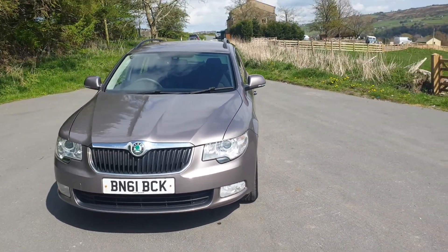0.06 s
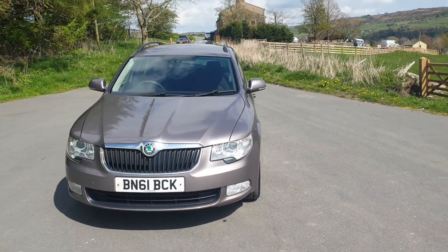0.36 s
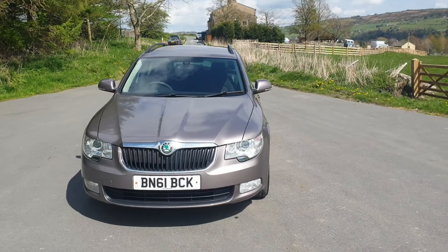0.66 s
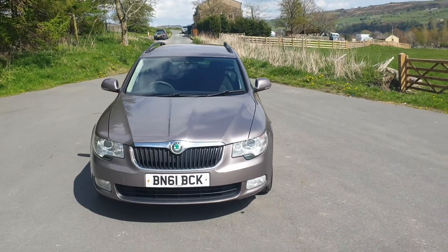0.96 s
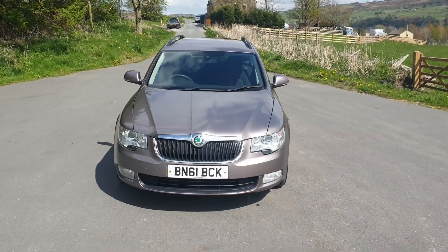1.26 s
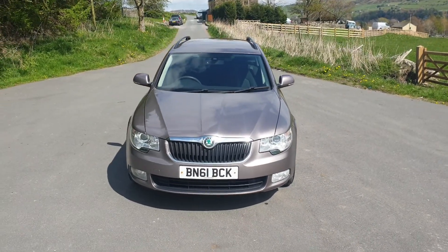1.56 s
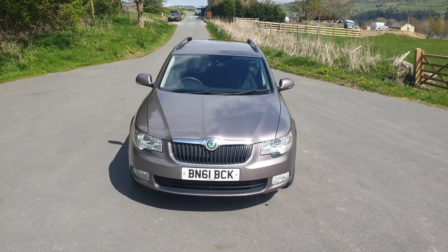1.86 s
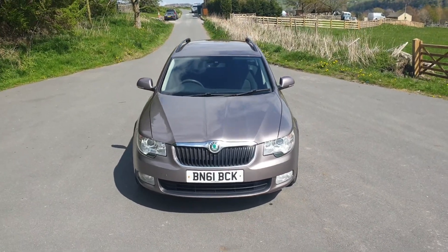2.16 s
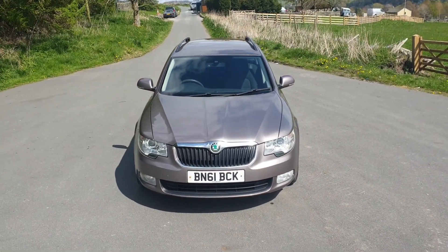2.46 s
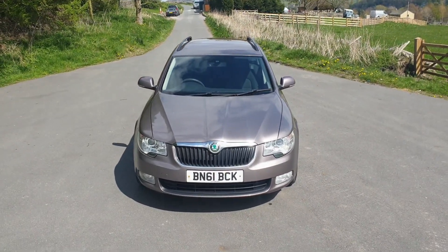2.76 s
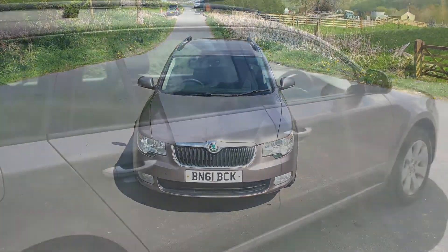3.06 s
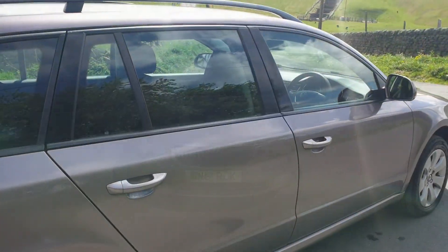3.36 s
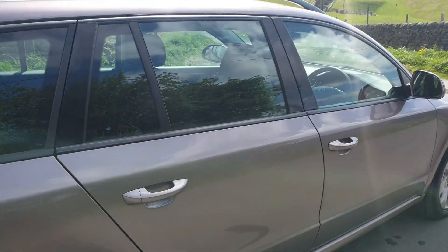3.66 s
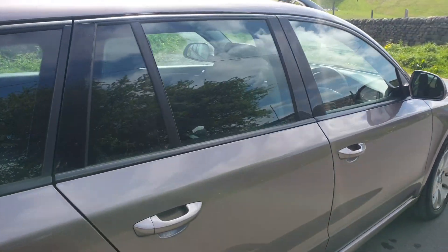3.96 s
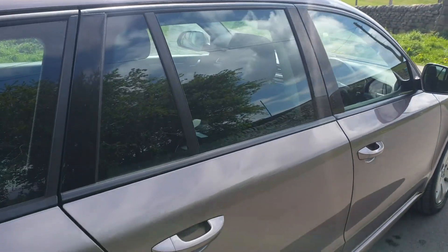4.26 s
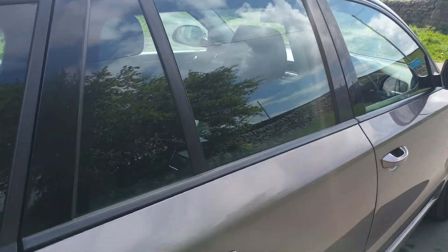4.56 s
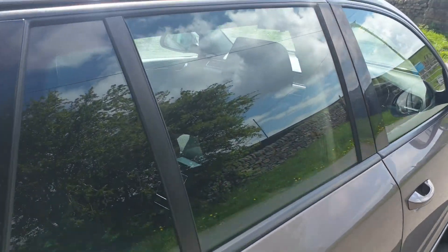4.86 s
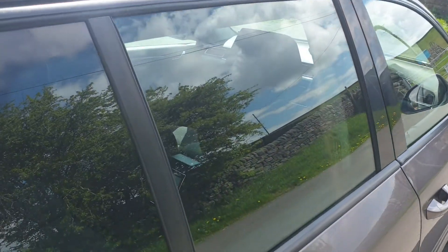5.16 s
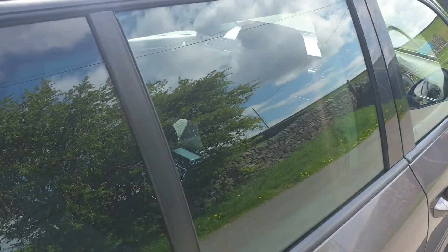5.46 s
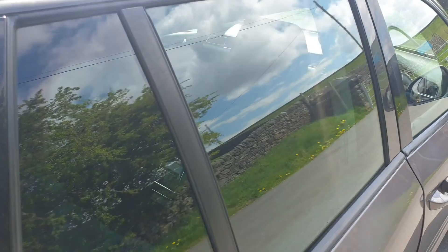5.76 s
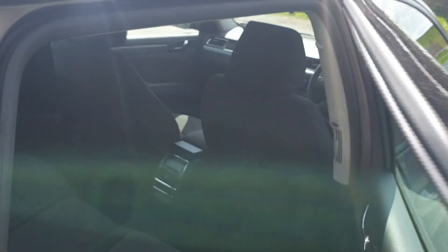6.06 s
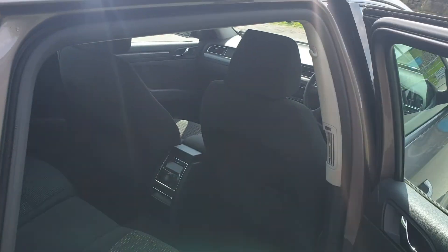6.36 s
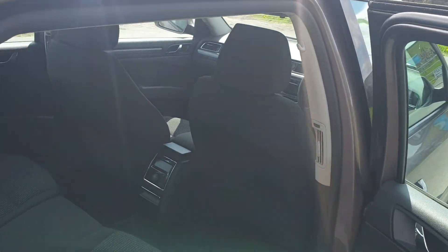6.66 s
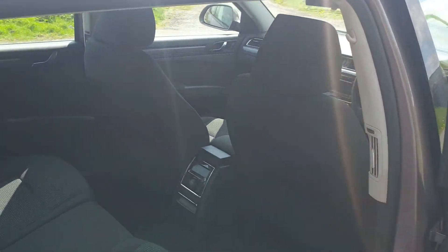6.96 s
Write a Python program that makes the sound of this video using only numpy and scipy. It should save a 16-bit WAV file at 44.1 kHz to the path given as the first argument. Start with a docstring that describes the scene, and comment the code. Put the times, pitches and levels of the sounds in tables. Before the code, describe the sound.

A faint open-air hiss runs throughout. From the start, a car backs slowly away straight ahead, its engine throbbing low and quiet over a soft tyre roar. Grit pops and crunches under the tyres around 0.6 seconds and again from 1.3 to 1.7. Small birds to the right open with a quick trill, then give scattered high, gliding whistles until nearly 6 seconds, with faint leaf rustle. At about 3.3 seconds the car fades out and wind begins buffeting the microphone, with uneven rumble and low thumps shifting between sides until the end. At 5.6 seconds a car door handle is pulled close by, making a quick cluster of clunks. Just after 6 seconds the latch snaps free with a sharp metallic clack, the loudest sound, and a brief rustle of rubber seal. A few light knocks and ticks follow as the door swings open, through 7 seconds.

```python
"""On a country lane, a car backs slowly away from the microphone, engine throbbing, tyres popping grit.
Small birds whistle in the hedges, off to the right, and leaves stir over a faint hiss of open air.
After about three seconds the car fades out, and wind buffets the microphone, now close to its side.
The rear door handle is pulled, the latch snaps free and the door swings open,
each contact ringing the panels while plastic and rubber rub."""
import sys
import numpy as np
from scipy import signal
from scipy.io import wavfile

SR = 44100
rng = np.random.default_rng(int(sys.argv[2]) if len(sys.argv) > 2 else 0)


def to_wav(s):
    """Save 16-bit WAV."""
    ch = np.atleast_2d(s).T  # columns
    pcm = np.round(np.clip(ch, -1, 1) * 32767)  # PCM
    wavfile.write(sys.argv[1], SR, pcm.astype(np.int16))


N = 313101
TIME = np.arange(N) / SR
CUTOFF_HZ = 15850


def from_db(db):
    return 10 ** (np.asarray(db) / 20)


def rms_one(x):
    return x / np.sqrt(np.mean(x ** 2) + 1e-20)


def in_time(rows):
    """Each column of a curve at every sample."""
    s, *columns = np.transpose(rows)
    return [np.interp(TIME, s, c) for c in columns]


def at_hz(points, hz, column=1):
    """One column of a table, read on a log-frequency axis."""
    points = np.array(points)
    return np.interp(np.log(hz), np.log(points[:, 0]), points[:, column])


def panned(left_right_db):
    """Left and right gains of constant power; positive is to the left."""
    gains = from_db(np.array([[.5], [-.5]]) * left_right_db)
    return gains / np.sqrt(np.mean(gains ** 2, axis=0))


def add(out, s, sound):
    """Mix a sound in at a time."""
    start = max(round(s * SR), 0)
    out[..., start:start + sound.shape[-1]] += sound[..., :N - start]


def filtered(x, hz, kind, order=2):
    sos = signal.butter(order, np.clip(hz, 10, .45 * SR), kind, fs=SR, output="sos")
    return signal.sosfilt(sos, x)


def drift(rate_hz):
    """A smooth random wander with rms 1."""
    pole = np.exp(-80 * np.pi * rate_hz / SR)
    white = rng.standard_normal(N // 40 + 2002)
    slow = signal.lfilter([1], [1, -2 * pole, pole * pole], white)[2000:]
    return np.interp(np.arange(N) / 40, np.arange(len(slow)), rms_one(slow))


def swell(s, width_s, db):
    """A bell-shaped rise and fall around a moment."""
    return from_db(db) * np.exp(-.5 * ((TIME - s) / width_s) ** 2)


def noise_bands(size, low_hz, high_hz, likeness):
    """Half-octave bands of stereo noise, each with its centre in Hz."""
    edges = 22 * 2 ** np.arange(0, 10, .5)
    white = rng.standard_normal((2, 2, size))
    for k, (low, high) in enumerate(zip(edges, edges[1:])):
        if high > low_hz and low < high_hz:
            mid, side = filtered(white[k % 2], [low, high], "band")
            hz = np.sqrt(low * high)
            alike = np.clip(at_hz(likeness, hz), -1, 1)
            yield hz, np.sqrt(1 + alike) * mid + np.sqrt(1 - alike) * side * [[1], [-1]]


# How alike the microphone's two ports hear the lane. Each row: frequency in Hz, correlation.
PORT_LIKENESS = [(60, 1), (600, 0.67), (1400, 0.051), (2600, 0.03), (7000, 0.082), (12000, 0.96)]

def coloured(spectrum, patchy_db, rate_hz, likeness=PORT_LIKENESS):
    """Stereo noise whose bands each swell and sink on their own; rms 1."""
    bands = noise_bands(N, spectrum[0][0], spectrum[-1][0], likeness)
    shaped = (band * from_db(at_hz(spectrum, hz) + patchy_db * drift(rate_hz)) for hz, band in bands)
    return rms_one(sum(shaped))


def outdoors(x, t60, wet_db, delay_s):
    """Add diffuse scatter from hedges, walls and bodywork, different at each port."""
    t = TIME[:SR // 2]
    build_up = 1 - np.exp(-(t / delay_s) ** 2)
    tail = rng.standard_normal((2, len(t))) * from_db(-60 * t / t60) * build_up
    tail /= np.sqrt(np.sum(tail ** 2, axis=1, keepdims=True))
    return x + from_db(wet_db) * signal.fftconvolve(x, tail, axes=1)[:, :N]


# The air over the lane. Each row: time in seconds, relative level in dB.
AIR_LEVEL = [(0.0, -80), (2.25, -84), (3.12, -86), (4.6, -83), (4.78, -81.5), (5.5, -83.5)]
# Its colour. Each row: frequency in Hz, relative density in dB.
AIR_SPECTRUM = [(300, 13.5), (700, 0.5), (1000, 4.5), (1600, 4.5), (2700, 1.5), (5400, -5), (7200, -4),
                (8400, -7.5), (9500, -17.5), (12000, -4.5), (15500, 5)]

def air(gain_db=6.0):
    """A faint, even hiss of open country all round the microphone."""
    hiss_db, = in_time(AIR_LEVEL)
    return from_db(hiss_db + gain_db) * coloured(AIR_SPECTRUM, patchy_db=0.5, rate_hz=4.5)


# The engine, heard from the lane. Each row: time in seconds, relative level in dB.
ENGINE_LEVEL = [(0.0, -51.5), (0.98, -48), (1.3, -45.5), (1.9, -51), (2.6, -46), (2.84, -53.5),
                (3.25, -55.5)]
# Its drone. Each row: frequency in Hz, relative density in dB.
DRONE_SPECTRUM = [(25, -8.5), (45, -17.5), (70, -2.5), (130, -6), (190, -14), (280, -19.5), (400, -14),
                  (700, -66.5), (1500, -68)]
# Its hum. Each row: frequency in Hz, relative level in dB at the start, then when the car is gone.
ENGINE_TONES = [(53.5, -11, -7), (76.6, -8, -6), (138.4, -3, -12), (208.5, -7.5, -19)]
CAR_GONE_S, CAR_FADE_S = 3.42, 0.12

def engine(drone_db=3.0, tones_db=3.0, firing_hz=26.0, throb=0.15, waver_hz=1.51):
    """The idling engine's drone throbs with its firings, under low, wavering tones."""
    level_db, = in_time(ENGINE_LEVEL)
    firing = 1 + throb * np.sin(2 * np.pi * firing_hz * TIME)
    out = from_db(drone_db) * coloured(DRONE_SPECTRUM, patchy_db=4.0, rate_hz=3.3) * firing
    for hz, first_db, last_db in ENGINE_TONES:
        phase = 2 * np.pi * np.cumsum(hz + waver_hz * drift(3.32)) / SR
        tone_db = tones_db + np.interp(TIME, [0, CAR_GONE_S], [first_db, last_db])
        out += np.sqrt(2) * np.sin(phase) * from_db(tone_db)
    return from_db(level_db) * out


# The tyres rolling off down the lane. Each row: time in seconds, relative level in dB.
TYRE_LEVEL = [(0.0, -56.5), (0.66, -57), (1.77, -62), (2.32, -62.5), (2.47, -55), (2.62, -56), (2.78, -61),
              (3.25, -67)]
# Their roar. Each row: frequency in Hz, relative density in dB.
TYRE_SPECTRUM = [(150, 5), (300, 3.5), (400, -8.5), (520, 9.5), (800, 4), (1150, -6.5), (1500, -18),
                 (2200, -37), (4000, -2)]

def tyres(roar_db=2.5, tread_db=-61.0, brisk_db=-51.5, tread_growth=1.9):
    """Tyres roar softly on the asphalt; the tread sings out as the wheels turn faster."""
    rolling_db, = in_time(TYRE_LEVEL)
    roar = filtered(coloured(TYRE_SPECTRUM, patchy_db=0.5, rate_hz=1.8), 1400, "low", order=3)
    tread = filtered(coloured(TYRE_SPECTRUM, patchy_db=-5.0, rate_hz=18), [1020, 1240], "band")
    singing_db = tread_db + tread_growth * (rolling_db - brisk_db)
    return roar * from_db(rolling_db + roar_db) + rms_one(tread) * from_db(singing_db)


def car():
    """Engine and tyres, almost straight ahead of the microphone, fade out together."""
    fade = np.clip((CAR_GONE_S - TIME) / CAR_FADE_S, 0, 1)
    return (engine() + tyres()) * fade * panned(0.57)


# Stones on the lane. Each row: start in seconds, thump, tick and ring in relative dB, ring pitch in Hz.
STONE_POPS = [(.579, -36, -67, -50, 2040), (.588, -65, -64, -45, 1680), (1.3133, -29, -25.5, -40.5, 2960),
              (1.459, -68, -47, -81, 3000), (1.5812, -26, -37, -66, 3000), (1.595, -66, -43, -70, 3450),
              (1.701, -66, -40.5, -78, 3000)]
# Scuffs of finer grit. Each row: centre and width in seconds, level in dB.
SCUFFS = [(0, 0.029, -55), (0.594, 0.075, -67), (1.29, 0.087, -67), (1.34, 0.029, -60.5),
          (1.613, 0.091, -71.5)]
# Their crunch. Each row: frequency in Hz, relative density in dB.
CRUNCH_SPECTRUM = [(600, 4), (1600, 1), (3200, -5), (5000, -13), (7200, -13), (9000, -23), (12500, -13.5),
                   (16000, -22)]

def grit(thump_hz=520, thump_t60=0.0047, tick_t60=0.0024, stone_t60=0.0098, grain_db=3.5):
    """Stones pop from under the tyres and ring briefly; finer grit crunches in short scuffs."""
    out, t = np.zeros((2, N)), TIME[:SR // 20]
    for s, thump_db, tick_db, ring_db, stone_hz in STONE_POPS:
        thump = 2 * np.sin(2 * np.pi * thump_hz * t) * from_db(thump_db - 60 * t / thump_t60)
        tick = .5 * rng.standard_normal((2, len(t))) * from_db(tick_db - 60 * t / tick_t60)
        ring = np.sin(2 * np.pi * stone_hz * t) * from_db(ring_db - 60 * t / stone_t60)
        add(out, s, thump + tick + ring)
    scuffing = sum(swell(*scuff) for scuff in SCUFFS)
    crunch = coloured(CRUNCH_SPECTRUM, patchy_db=-4.0, rate_hz=23) * from_db(grain_db * drift(210))
    return out + scuffing * rms_one(crunch)


# Bird syllables by name. Each point: seconds into the note, base pitch in Hz, relative level in dB.
SYLLABLES = { "trill": [(0, 4000, -15), (.008, 3550, -6.5), (.017, 3000, -17), (.023, 4300, -30),
             (.030, 4750, -3), (.040, 5250, -1), (.048, 5600, -13)], "swoop": [(0, 8320, -16),
             (.025, 8040, -41), (.058, 7300, -3.5), (.072, 6230, 0), (.086, 4450, 1.5), (.094, 4120, -28),
             (.108, 3480, -5), (.122, 3050, -18), (.137, 3530, 0.5), (.15, 3650, -27)],
             "arch": [(0, 3866, -18), (.035, 4000, 7.5), (.055, 4380, 6.5), (.08, 4870, -4),
             (.095, 4150, 4.5), (.115, 3160, -22.5)], "rise": [(0, 2890, -28), (.033, 3570, -7.5),
             (.067, 3160, -13), (.095, 3900, -1), (.118, 4500, -0.5), (.13, 4500, -10)],
             "pip": [(0, 4340, -5), (.01, 4020, 14.5), (.022, 3920, 0)], "dip": [(0, 6150, -22),
             (.015, 6110, -2.5), (.032, 5500, 6.5), (.05, 4400, -27)], "slide": [(0, 5560, -10),
             (.012, 5600, -3.5), (.05, 5080, -2.5), (.09, 4694, -1), (.122, 4300, -5), (.135, 4180, -18.5)]}
# Songs from the hedges. Each row: start in seconds, syllable, repeats, period in seconds,
# pitch ratio, ratio change per repeat, relative level in dB.
SONGS = [(0.011, "trill", 7, .065, .99, 0, -51), (.489, "dip", 1, 0, 1.23, 0, -67),
         (0.588, "swoop", 2, .198, 0.98, 0, -52.5), (1.12, "pip", 4, .05, 1.02, 0, -71.5),
         (1.368, "dip", 2, .31, 1.23, .03, -61), (2.19, "dip", 1, 0, 1.22, 0, -73),
         (2.752, "arch", 1, 0, 1.06, 0, -72.5), (2.77, "rise", 1, 0, 1.38, 0, -74),
         (2.982, "arch", 2, .2, 0.97, -.02, -62), (3.401, "rise", 2, .236, 0.97, -.05, -57),
         (3.88, "arch", 1, 0, .76, 0, -70.5), (4.18, "arch", 2, .141, 0.72, -.02, -76),
         (5.0, "dip", 2, .133, 0.98, -.02, -58.5), (5.258, "slide", 3, .187, 1.007, -.013, -55)]

def birds(near_db=-5.0, quaver=0.0063, flicker_db=3.5, far_db=-68.0, scatter_db=-4.5):
    """Pure whistles glide; the fainter the bird, the more of it arrives as scatter from the trees."""
    near, far, t = np.zeros(N), np.zeros(N), TIME[:SR // 6]
    waver = 1 + quaver * drift(90)
    notes = [(s + k * period, name, ratio + k * step, db)
             for s, name, repeats, period, ratio, step, db in SONGS for k in range(round(repeats))]
    for k, (s, name, ratio, note_db) in enumerate(notes):
        when, hz, db = np.transpose(SYLLABLES[name])
        pitch = ratio * np.interp(t, when, hz) * waver[k * len(t):(k + 1) * len(t)]
        gate = np.clip(np.minimum(t, when[-1] - t) / 0.0026, 0, 1)
        envelope = from_db(note_db + np.interp(t, when, db)) * gate
        note = np.sin(2 * np.pi * np.cumsum(pitch) / SR) * envelope
        far_share = 1 / (1 + from_db(note_db - far_db))
        add(near, s, note * (1 - far_share))
        add(far, s, note * far_share)
    near = near * from_db(near_db + flicker_db * drift(43)) * panned(-7.0)
    far = far * panned(-5.5)
    scatter_only = outdoors(far, t60=0.63, wet_db=scatter_db, delay_s=0.0051) - far
    return outdoors(near, t60=0.3, wet_db=-4.5, delay_s=.006) + scatter_only


# Stirs in the leaves, and at 3.85 s one brief, faint high tick of handling.
# Each row: centre and width in seconds, relative level in dB.
STIRS_AND_TICK = [(1.302, 0.041, -58), (3.853, .03, -69), (4.724, 0.21, -67.5), (5.9, 0.33, -68.5)]
# Their colour. Each row: frequency in Hz, relative density in dB.
HIGH_RUSTLE_SPECTRUM = [(4500, -26.5), (6000, -9.5), (7100, 3), (8500, -12)]

def leaves_and_tick(gain_db=-9.0):
    """Well to the right of the microphone, the breeze rustles leaves and handling gives one tick."""
    rustle = filtered(coloured(HIGH_RUSTLE_SPECTRUM, patchy_db=2.0, rate_hz=24), 7800, "low", order=8)
    envelope = sum(swell(*row) for row in STIRS_AND_TICK)
    return from_db(gain_db) * envelope * rustle * panned(-15.0)


# Wind right on the microphone. Each row: time in seconds, relative strength in dB.
WIND_LEVEL = [(3.2, -57), (3.33, -41.5), (4.01, -40.5), (4.07, -30), (4.14, -42), (4.44, -47),
              (4.55, -56.5), (4.69, -44.5), (4.8, -52), (5.06, -31.5), (5.15, -39), (5.28, -28.5),
              (5.34, -42.5), (5.66, -32), (5.71, -39.5), (5.84, -31), (5.88, -46.5), (6.03, -38),
              (6.52, -42.5), (6.55, -47.5), (6.81, -41.5), (7.1, -59)]
# The left port drops in and out of the lee. Each row: time in seconds, left over right in dB.
LEE = [(3.2, -1), (3.26, -18), (3.57, -3), (3.69, -31), (3.76, -5.5), (3.97, -30.5), (4.12, 13.0),
       (4.23, -33), (4.31, -11), (4.4, -38.5), (4.98, -27.5), (5.44, 21), (5.51, 2.5), (6.34, 3.5),
       (6.38, -26), (6.76, -28), (6.81, -7), (7.1, -38)]
# Hard gusts across the ports. Each row: centre and width in seconds, level and left over right in dB.
GUSTS = [(3.449, 0.0043, -47, 11), (4.107, 0.008, -50.5, -14), (4.61, 0.0064, -50, 25),
         (5.109, 0.024, -35, 14), (5.175, 0.011, -32, 17), (5.276, 0.028, -47.5, -10),
         (5.419, 0.028, -49, -21), (5.569, .014, -39.5, -7.5), (6.388, 0.0066, -50.5, 18),
         (6.71, 0.039, -50.5, 18), (6.999, 0.0058, -47, -2.5)]
# The wind's three colours. Each row: frequency in Hz, relative density in dB.
BUFFET_SPECTRUM = [(22, -3.5), (40, 0), (70, 5), (130, -0.5), (200, -10.5), (300, -19.5), (450, -42),
                   (700, -66), (1400, -63.5)]
FLUTTER_SPECTRUM = [(150, -20), (280, 10.5), (400, 5.5), (520, -19), (700, -22.5), (1100, -37)]
RASP_SPECTRUM = [(200, -10), (330, 19), (460, 15.5), (620, -15.5), (850, -27.5), (1200, -60), (1600, -37)]

def wind(buffet_db=2.0, calm_db=-62.5, flutter_db=-63.0, breakup_db=-37, growth=1.2, lumpy_db=2.0):
    """Turbulence presses on each port separately; hard gusts rasp higher."""
    (level_db,), (side_db,) = in_time(WIND_LEVEL), in_time(LEE)
    buffeting = from_db(level_db + buffet_db) * panned(side_db)
    # As the flow breaks up, its flutter grows faster than the wind.
    fluttering = from_db(calm_db) + from_db(flutter_db + growth * (level_db - breakup_db))
    rasping = sum(swell(s, width, db) * panned(pan_db) for s, width, db, pan_db in GUSTS)
    lumps = rms_one(from_db(lumpy_db * np.array([drift(26), drift(22)])))
    ports = [(50, 0.14), (400, 0.32)]   # frequency in Hz, correlation
    buffet = coloured(BUFFET_SPECTRUM, patchy_db=1.0, rate_hz=21, likeness=ports)
    buffet = filtered(buffet, 520, "low", order=4)
    flutter = coloured(FLUTTER_SPECTRUM, patchy_db=-4.5, rate_hz=14, likeness=ports)
    flutter = filtered(flutter, 850, "low", order=4)
    rasp = coloured(RASP_SPECTRUM, patchy_db=7.5, rate_hz=82, likeness=ports)
    rasp = filtered(rasp, 1450, "low", order=6)
    fade_in = np.interp(TIME, [3.1, 3.3], [0, 1])
    return (buffet * buffeting + flutter * fluttering) * lumps * fade_in + rasp * rasping


# Strong eddies. Each row: centre in seconds, relative peak in dB, pitch in Hz, left over right in dB.
EDDIES = [(3.339, -21.5, 118, -2.5), (3.458, -19, 136.6, -1.5), (3.984, -25, 182, -25),
          (4.05, -18.5, 119, -5), (4.077, -19, 117, -6), (4.124, -20, 113, 15.5), (4.308, -24, 93, 0),
          (5.252, -21, 119, -9), (5.279, -21.5, 86, 24), (5.567, -22.5, 114, -1), (5.823, -27.5, 129, 3),
          (6.292, -21, 89, 3), (6.347, -21, 168, 5), (6.502, -23.5, 123, -6), (6.824, -22, 81, -10)]

def eddies(gain_db=-2.0, width_cycles=0.53):
    """Each eddy hits the microphone as one low thump, out of step between the ports."""
    out, t = np.zeros((2, N)), TIME[:SR // 10] - .05
    for s, peak_db, hz, pan_db in EDDIES:
        phase = 2 * np.pi * hz * t + rng.normal(0, 0.91, (2, 1))
        thump = np.exp(-(t * hz / width_cycles) ** 2) * np.cos(phase)
        add(out, s + t[0], from_db(peak_db + gain_db) * thump * panned(pan_db))
    return out


# Contacts in handle, latch and hinge, close to the microphone, and at 6.8 s one faint tick of handling. # Each
# row: start in seconds, then panel thud, metal clack and tick in relative dB.
DOOR_HITS = [(5.582, -41.5, -33, -22.5), (5.588, -31, -21.5, -36), (5.621, -7, -9, -45),
             (5.627, -8, -9, -17.5), (5.6375, -4.5, -17, -29), (5.647, -31, -66, -26),
             (5.658, -32, -48, -41), (5.698, -22, -26.5, -44), (6.0634, -6, 2.5, 1),
             (6.0712, -0.5, -1, -13), (6.0794, -4.5, -6.5, -29.5), (6.259, -30.5, -40, -43),
             (6.279, -21, -28.5, -59), (6.289, -45, -60, -34), (6.355, -30.5, -61, -43),
             (6.407, -37, -75.5, -39), (6.8, -46, -70, -43), (6.992, -43, -46, -54)]
# The door's clear modes, and its crowd of short ones.
# Each row: frequency in Hz, relative level in dB, seconds to fall by 60 dB.
DOOR_MODES = [(220, -21.5, 0.15), (315.6, -30, 0.14), (391, -25.5, 0.12), (427, -20, 0.16),
              (536, -25, 0.057), (649, -30.5, 0.056), (710, -27, 0.14), (910, -29, 0.055),
              (1015, -28.5, .1), (1122, -24, .09), (1190, -49, 0.49), (1194, -25.5, 0.048),
              (1290, -33, 0.041), (1394, -35.5, 0.11), (1897.5, -28, 0.093), (2200, -42, .08),
              (2590, -33.5, .06), (3030, -29.5, .045), (3350, -38.5, 0.022), (4880, -25, .045)]
DOOR_CLATTER = [(90, -44, 0.13), (250, -17.5, 0.15), (480, -21.5, 0.13), (1120, -24, 0.11),
                (2022, -26, 0.065), (3060, -25.5, 0.025), (4650, -27, 0.036), (7000, -34.5, 0.052),
                (11000, -44.5, 0.084), (15000, -51.5, .06)]

def door(clatter_db=-1.5, spread_db=1.0, left_lag_s=0.00027, panel_rise_cycles=0.61):
    """Every contact rings the door's modes and a dense clatter; heavy panels take a cycle to move."""
    out, t = np.zeros((2, N)), TIME[:SR // 3]
    port_time = np.maximum(t - np.array([[left_lag_s], [0]]), 0)   # the right port is nearer
    bands = [(hz, rms_one(band)) for hz, band in noise_bands(N, 60, CUTOFF_HZ, PORT_LIKENESS)]
    for k, (s, thud_db, clack_db, tick_db) in enumerate(DOOR_HITS):
        contact = [(400, thud_db), (1150, clack_db), (5500, tick_db)]
        for (hz, db, t60), chance in zip(DOOR_MODES, rng.standard_normal(len(DOOR_MODES))):
            strength_db = db + at_hz(contact, hz) + spread_db * chance
            mode = rng.choice([-1, 1]) * np.sin(2 * np.pi * hz * port_time)
            add(out, s, mode * from_db(strength_db - 60 * t / t60))
        for hz, band in bands:
            strength_db = clatter_db + at_hz(DOOR_CLATTER, hz) + at_hz(contact, hz)
            rise = 1 - np.exp(-t * hz / panel_rise_cycles)
            decay = from_db(strength_db - 60 * t / at_hz(DOOR_CLATTER, hz, column=2))
            add(out, s, band[:, k * len(t):(k + 1) * len(t)] * rise * decay)
    return outdoors(out * panned(-2.0), t60=0.14, wet_db=-15.5, delay_s=0.012)


# The handle sliding, a brief bright rustle swelling just before the latch snaps, and the rubber seal
# peeling off its frame. Each row: start and rise time in seconds, level in dB.
DOOR_RUSTLES = [(5.584, 0.01, -60.5), (5.61, 0.0083, -49), (5.65, 0.019, -61), (5.931, 0.023, -70.5),
                (6.038, 0.023, -48.5), (6.07, 0.039, -60), (6.258, 0.017, -64.5)]
# Their colour. Each row: frequency in Hz, relative density in dB.
DOOR_RUSTLE_SPECTRUM = [(900, 10.5), (1800, 5), (3000, -2.5), (5000, -5), (7200, -5), (9000, -15),
                        (12000, -11), (16000, -12)]

def door_rustles(grain_db=-4.0):
    """Close, bright rustles swell fast and die slowly; at handle and seal, surfaces stick and slip."""
    envelope = 0
    for s, rise, db in DOOR_RUSTLES:
        age = np.maximum(TIME - s, 0) / rise
        envelope = envelope + from_db(db) * age * np.exp(1 - age)
    rustle = coloured(DOOR_RUSTLE_SPECTRUM, patchy_db=3.0, rate_hz=30) * from_db(grain_db * drift(200))
    return envelope * rms_one(rustle) * panned(-2.3)


# The latch springing free. Each row: centre in seconds, peak in dB, pitch in Hz, width in seconds.
LATCH_SNAP = [(6.0646, -5.0, 1200, .0012)]

def latch_snap(left_lag_s=0.00025):
    """Close by and just to the right, the claw lets go of the striker with a crack a few cycles long."""
    out, t = np.zeros((2, N)), TIME[:SR // 100] - .005
    port_time = t - np.array([[left_lag_s], [0]])
    for s, peak_db, hz, width in LATCH_SNAP:
        envelope = from_db(peak_db) * np.exp(-(port_time / width) ** 2)
        add(out, s + t[0], envelope * np.cos(2 * np.pi * hz * port_time))
    return out * panned(-2.0)


def scene():
    lane = air() + car() + grit() + birds() + leaves_and_tick()
    return lane + wind() + eddies() + door() + door_rustles() + latch_snap()


def record(dry):
    """The microphone loses the deepest rumble and the very top."""
    top_cut = signal.ellip(10, .1, 70, CUTOFF_HZ, fs=SR, output="sos")
    return signal.sosfilt(top_cut, filtered(dry, 22, "high"))


dry = scene()
out = record(dry)
to_wav(out)
```